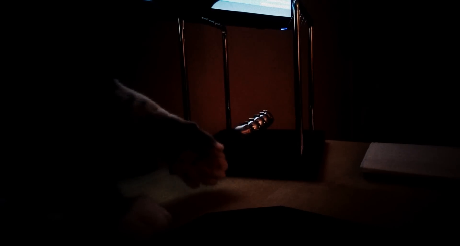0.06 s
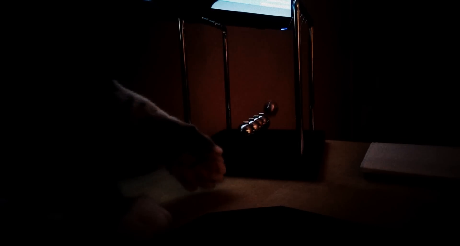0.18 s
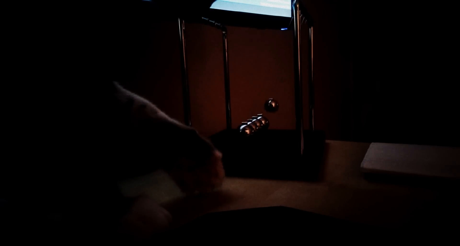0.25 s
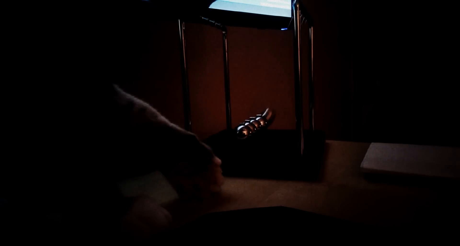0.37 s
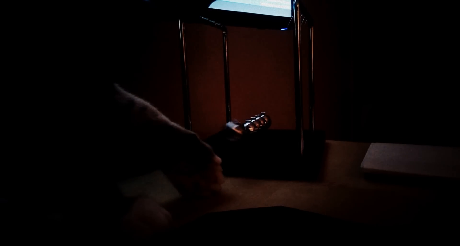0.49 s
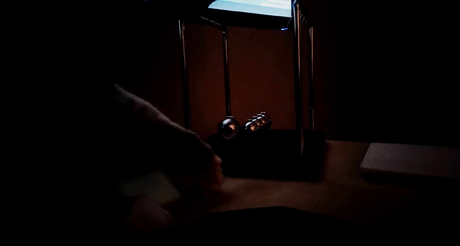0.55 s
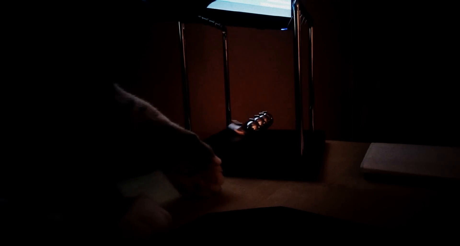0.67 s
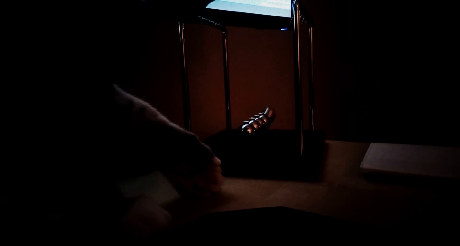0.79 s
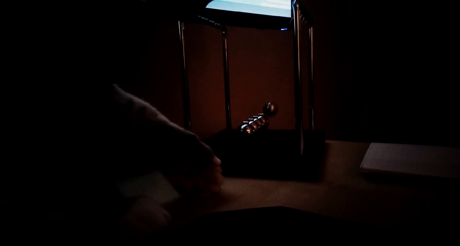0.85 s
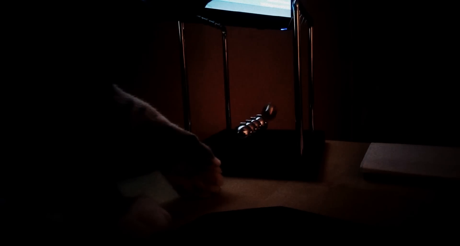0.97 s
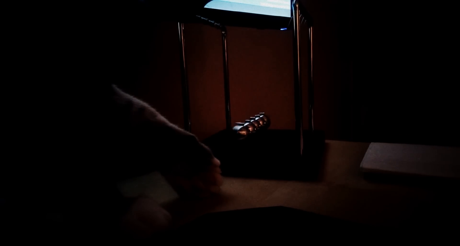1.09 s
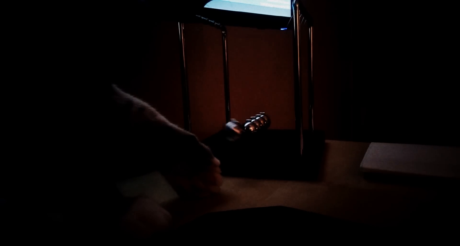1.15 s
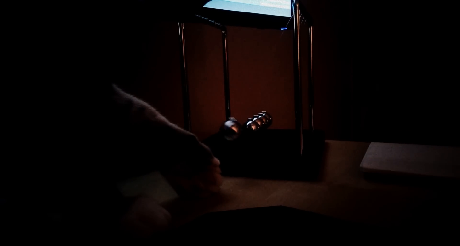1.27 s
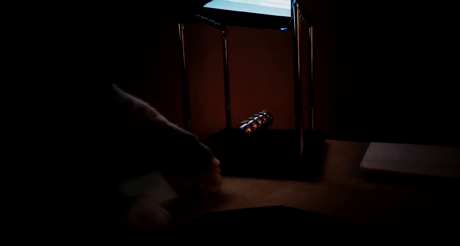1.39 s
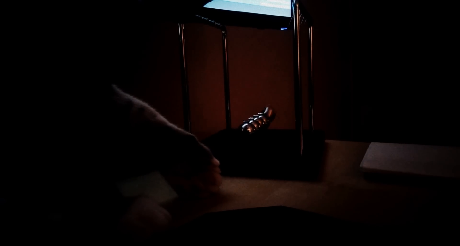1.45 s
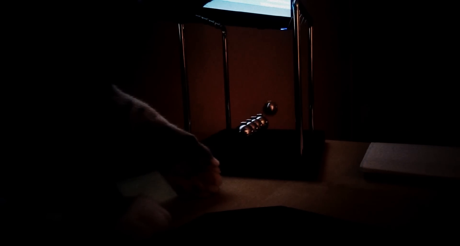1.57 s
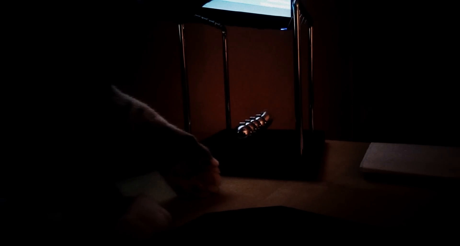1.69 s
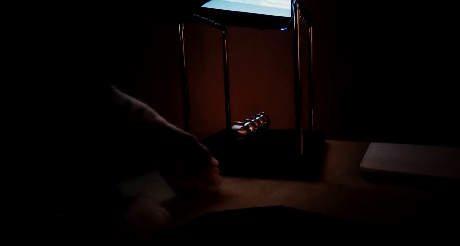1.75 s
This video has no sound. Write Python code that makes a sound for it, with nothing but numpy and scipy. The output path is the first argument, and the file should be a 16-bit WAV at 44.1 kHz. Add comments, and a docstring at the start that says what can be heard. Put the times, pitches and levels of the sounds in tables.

```python
"""A Newton's cradle swings on a desk, close by: each contact of steel balls is a minimum-phase pulse.
Three times a second a ball lands with one dry click, then a tight rattle 9 to 16 ms later as the row closes up.
Between the clacks the loose balls tick softly against each other. Near echoes, scatter and damped
modes of the frame colour the direct sound, and decaying noise forms the room's answer.
Behind it, filtered noise gives a quiet room, a faint hum and a low rumble of desk and rocking frame."""
import sys
import numpy as np
from scipy import signal
from scipy.fft import rfft, irfft
from scipy.io import wavfile

SR = 44100
rng = np.random.default_rng(int(sys.argv[2]) if len(sys.argv) > 2 else 0)


def to_wav(sig):
    """Store sig (one row per channel, or 1-D mono) as 16-bit WAV at the path in sys.argv[1].

    Samples outside -1..1 are clipped; the rate is SR.
    """
    pcm = np.clip(np.atleast_2d(sig), -1, 1) * 32767
    pcm = np.round(pcm).astype(np.int16)
    wavfile.write(sys.argv[1], SR, pcm.T)  # frames by channels


N = 79380
LEAD = SR // 4  # samples before the start: the cradle is already swinging

# spectrum of the background noise: frequency_hz, level_db (re unit white noise)
NOISE_SPECTRUM = [(20, -59), (40, -51.5), (90, -52), (250, -46), (420, -49), (780, -51), (1100, -55.5),
                  (1500, -59.5), (2500, -59), (4000, -67), (7000, -68), (10000, -71), (15000, -72)]
# narrow bands of hum: centre_hz, half_width_hz (power falls to exp(-2)), level_db (re unit white noise)
HUM_BANDS = [(58.3, 10.8, -35.5), (129, 22.3, -43), (216.7, 11.7, -35.5), (315.8, 6.5, -37)]
# correlation of left and right background: frequency_hz, correlation (0-1)
NOISE_CORRELATION = [(30, 0.89), (120, 0.78), (280, 0.93), (700, 0.57), (1500, 0), (8000, 0)]
# gain of the low rumble of desk and rocking frame: time_s, gain_db
RUMBLE_GAIN = [(.04, 0.5), (.19, 0), (.32, 4.5), (.39, -3.5), (.6, 8.5), (.75, 1), (.87, -4), (.95, 9),
               (1.12, -6), (1.23, 10), (1.36, -6.5), (1.52, -5), (1.64, 1.5), (1.8, -3.5)]
RUMBLE_TOP_HZ = 154  # amplitude gain of the rumble filter is one half here

# steel-on-steel contacts: start_s, level_db (relative), tilt_db_per_octave
BALL_CONTACTS = [ (-.112, -13, -20), (-.096, 6.5, 0.5), (0.0465, -14.5, -3.5), (.0640, -18.5, -4.5),
                 (0.1014, -16, -3.5), (.21489, .8, 0), (.22945, -.3, 0), (.23094, 0, -.5),
                 (.23122, .3, -.5), (0.3686, -16, -1), (.3716, -16.5, -1.5), (0.4042, -18, -1),
                 (.54142, .8, 0), (.55605, -.5, .3), (.55641, -.6, 0), (.55698, -2.5, 0),
                 (0.6855, -26, -16), (0.6869, -16, -2), (0.7107, -17, -1), (0.809, -41, -8),
                 (.8201, -30.5, -11), (.86924, -.3, 0), (.88185, -3, .5), (.88201, -3, 0), (.88439, -2, -1),
                 (.9982, -20.5, 2), (1.0009, -18.5, -5), (1.0175, -19.5, -4), (1.0851, -33.5, -5),
                 (1.19584, 0, 0), (1.20688, 0, .3), (1.20724, 0, .3), (1.20779, 0, .3), (1.3098, -18.5, -1),
                 (1.3141, -19.5, -3.5), (1.3222, -22, 0), (1.52344, -1, 0), (1.53226, -1, 0),
                 (1.53271, -.3, 0), (1.53305, -1, 0), (1.61, -21, -1.5), (1.613, -22, -1.5),
                 (1.6190, -22, -3)]
# spectrum of the room's answer: frequency_hz, left_db, right_db (relative)
ROOM_SPECTRUM = [(300, -45, -45), (800, -24, -25), (1300, -19, -21), (2000, -13, -17), (2800, -9, -12.5),
                 (3550, 0, -11.5), (4500, -4.5, -7.5), (5500, -3.5, -5), (7300, -9, -3.5),
                 (9000, -11, -7.5), (10000, -15, -14), (13800, -15, -6), (15400, -17, -11),
                 (16000, -28, -26)]
# decay of the late room tail: frequency_hz, t60_s
ROOM_DECAY = [(500, 0.3), (2500, 0.54), (4500, 0.52), (8000, 0.37), (14000, .27)]
LATE_DB, ROOM_DELAY_S, ROOM_RISE_S = -5, .0055, .006
EARLY_DB, EARLY_T60_S = -2.5, .042  # first scatter from desk and walls

# spectrum of one direct click: frequency_hz, left_db, right_db (relative)
CLICK_SPECTRUM = [(200, -45, -45), (700, -30, -32), (1100, -16.5, -23), (1600, -15.5, -11.5),
                  (2100, -18.5, -8), (2700, -4.5, -2.5), (3600, 8.3, 2.8), (4750, 2, 2.5), (5300, 6.5, 8),
                  (6500, .8, 8), (7600, -6, 8.3), (8900, -8.5, 4.8), (10200, -9, -2), (11300, -11, -.5),
                  (12800, -8.5, 4.8), (14400, -2, 6), (15800, -13, -2)]
# reflections from nearby surfaces: delay_ms, left_gain, right_gain (re the direct click)
NEAR_ECHOES = [(.47, .62, .03), (1.12, .27, .06)]
# brief modes of the frame: frequency_hz, t60_s, left_db, right_db (relative)
FRAME_MODES = [(3550, .010, -29, -46), (7900, .008, -44, -38), (14200, .007, -42, -34)]
CLICK_DB = -0.33
SCATTER_DB, SCATTER_T60_S = -14.5, .0045  # click bouncing inside the cradle
LEFT_LAG_MS = .032  # the left side is farther away
BAND_LIMIT_HZ = 16000


def amp(db):
    """Decibels are twenty times the logarithm of an amplitude ratio."""
    return 10 ** (np.asarray(db) / 20)


def read(points, hz, axis=1):
    """Interpolation of one table column along logarithmic frequency."""
    table = np.array(points, float)
    return np.interp(np.log(hz + 1), np.log(table[:, 0]), table[:, axis])


def decay(t, t60_s):
    """Exponential decay: the amplitude falls by 60 dB in t60_s."""
    return np.exp(-np.log(1000) * t / t60_s)


def add(mix, s, sound):
    """Superposition: a sound starting at s seconds is summed into the mix."""
    part = mix[LEAD + round(s * SR):][:len(sound)]
    part += sound[:len(part)]


def minimum_phase_pulse(db):
    """Minimum phase: the Hilbert transform of log gain gives the most compact causal pulse."""
    log_gain = np.log(amp(np.r_[db, db[-2:0:-1]]))
    spectrum = np.exp(np.conj(signal.hilbert(log_gain)))
    return np.fft.ifft(spectrum).real[:len(db)]


def background():
    """Filtered noise: spectral shaping gives the floor and hum, shared noise gives stereo correlation."""
    hz = np.fft.rfftfreq(N, 1 / SR)
    shared, separate = rfft(rng.standard_normal((2, N)))
    power = amp(read(NOISE_SPECTRUM, hz)) ** 2
    for centre, width, db in HUM_BANDS:
        power += amp(db) ** 2 * np.exp(-2 * ((hz - centre) / width) ** 2)
    same = np.clip(read(NOISE_CORRELATION, hz), 0, 1)
    right = same * shared + np.sqrt(1 - same ** 2) * separate
    return irfft(np.array([shared, right]) * np.sqrt(power), N)


def rumble_swell(noise):
    """Amplitude modulation of the low band: rumble of desk and rocking frame swells after the clacks."""
    hz = np.fft.rfftfreq(N, 1 / SR)
    rumble = irfft(rfft(noise) / (1 + (hz / RUMBLE_TOP_HZ) ** 8), N)
    gain_db = np.interp(np.arange(N) / SR, *np.transpose(RUMBLE_GAIN))
    return noise + rumble * (amp(gain_db) - 1)


def contacts(count=4):
    """Impulsive excitation: each contact is one sharp push, dealt in turn to four sets of responses."""
    hz = np.fft.rfftfreq(256, 1 / SR)
    pushes = np.zeros((count, LEAD + N))
    octaves = np.log2(np.maximum(hz, 4500) / 6000)  # tilt about 6 kHz, level below 4.5 kHz
    for k, (s, db, tilt) in enumerate(BALL_CONTACTS):
        add(pushes[k % count], s, amp(db) * minimum_phase_pulse(tilt * octaves))
    return pushes


def room(axis):
    """Diffuse reverberation: dense reflections act as decaying noise, early scatter plus a late tail."""
    t = np.arange(SR * 3 // 4) / SR
    late, early = rng.standard_normal((2, len(t)))
    early = early * decay(t, EARLY_T60_S)
    early = early / np.linalg.norm(early)

    # each frequency of the late tail dies at its own rate, with its energy held equal
    hz, when, bands = signal.stft(late, SR, nperseg=256)
    rate = np.log(1000) / read(ROOM_DECAY, hz)[:, None]
    bands = bands * np.exp(-rate * when) * np.sqrt(2 * rate / SR)
    late = signal.istft(bands, SR)[1][:len(t)]

    tail = amp(LATE_DB) * late + amp(EARLY_DB) * early
    tail = tail * np.minimum(t / ROOM_RISE_S, 1)
    hz = np.fft.rfftfreq(1024, 1 / SR)
    colour = minimum_phase_pulse(read(ROOM_SPECTRUM, hz, axis=axis + 1))
    return np.r_[np.zeros(round(ROOM_DELAY_S * SR)), signal.fftconvolve(tail, colour)]


def click(axis):
    """Direct radiation: a pulse reaches one side with near echoes, scatter and damped frame modes."""
    hz, t = np.fft.rfftfreq(2048, 1 / SR), np.arange(2048) / SR
    pulse = minimum_phase_pulse(read(CLICK_SPECTRUM, hz, axis=axis + 1))

    def delay(ms):
        """A pure delay is a phase shift proportional to frequency."""
        return np.exp(-2j * np.pi * hz * ms / 1000)

    scatter = rng.standard_normal(len(t)) * t * decay(t, SCATTER_T60_S)
    paths = 1 + amp(SCATTER_DB) * rfft(scatter / np.linalg.norm(scatter))
    for echo in NEAR_ECHOES:
        paths = paths + echo[axis + 1] * delay(echo[0])

    ring = np.zeros(len(t))
    for mode in FRAME_MODES:
        ring += amp(mode[axis + 2]) * decay(t, mode[1]) * np.cos(2 * np.pi * mode[0] * t)

    spectrum = amp(CLICK_DB) * rfft(pulse, len(t)) * paths + rfft(ring)
    return irfft(spectrum * delay(LEFT_LAG_MS * (1 - axis)))[:len(hz)]


def scene():
    """Linear superposition: each set of pushes passes through its own random scatter and room tail."""
    out = rumble_swell(background())
    for pushes in contacts():
        for side in range(2):
            for path in (click(axis=side), room(axis=side)):
                out[side] += signal.fftconvolve(pushes, path)[LEAD:LEAD + N]
    return out


def record(dry):
    """Band limiting: a linear-phase low-pass filter removes the highest treble."""
    low_pass = signal.firwin(101, BAND_LIMIT_HZ, window=("kaiser", 7), fs=SR)
    return signal.oaconvolve(dry, low_pass[None], "same")


dry = scene()
out = record(dry)
to_wav(out)
```